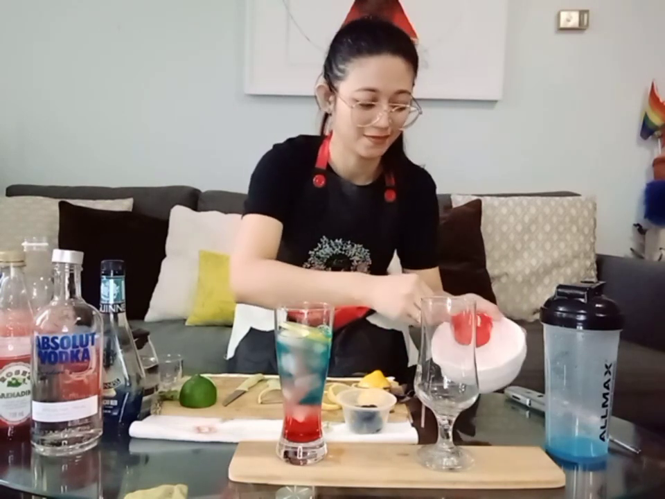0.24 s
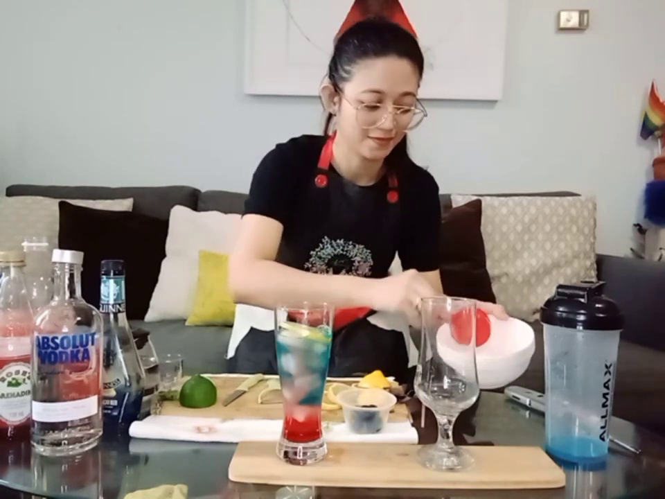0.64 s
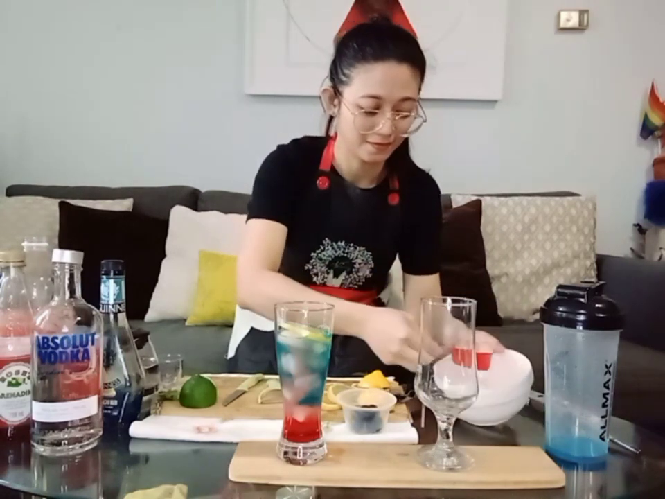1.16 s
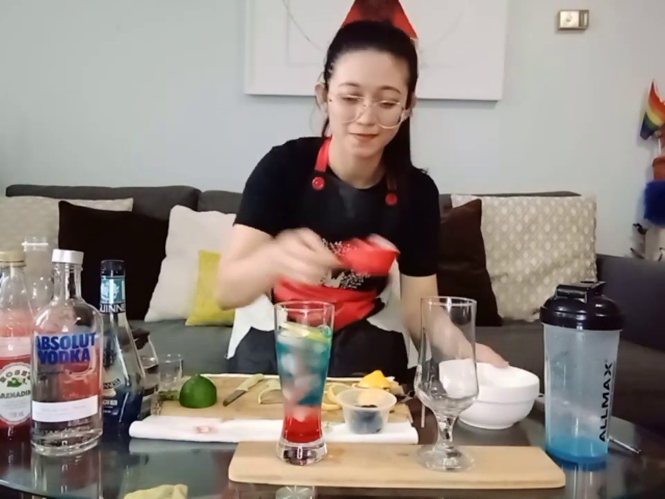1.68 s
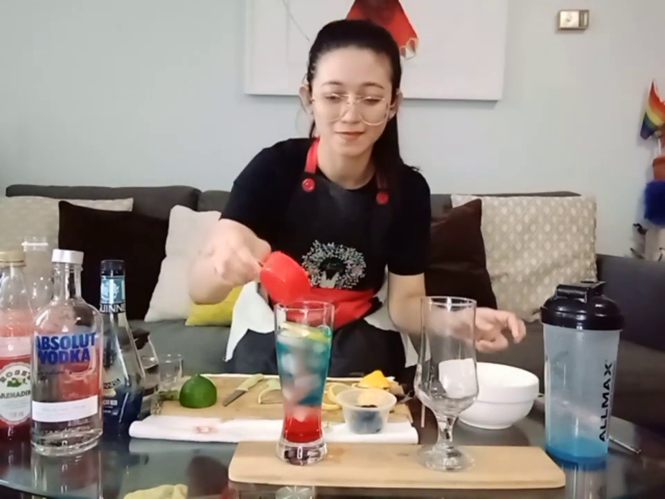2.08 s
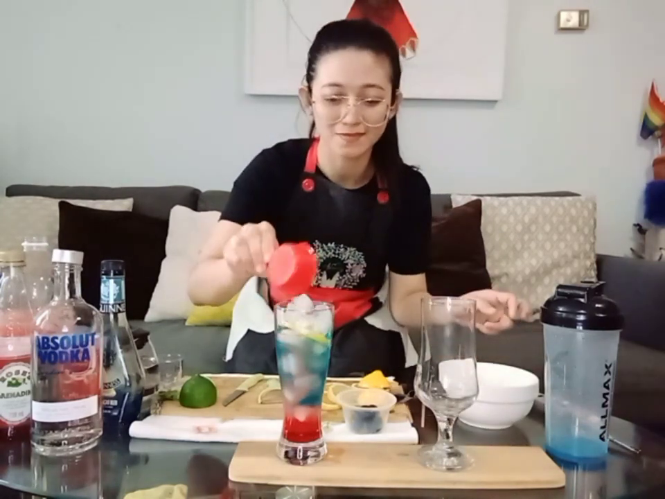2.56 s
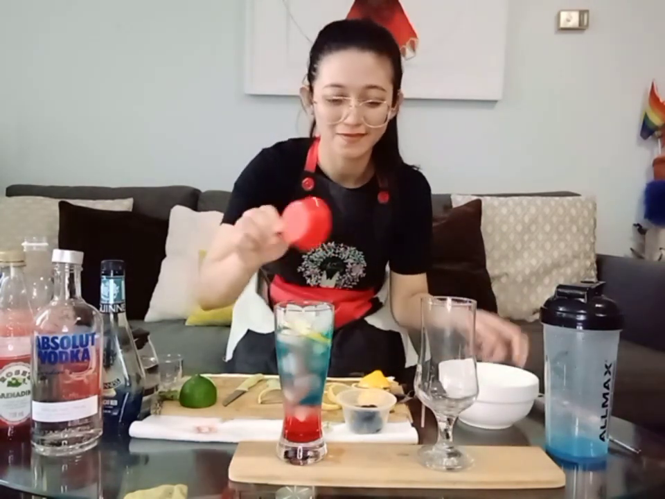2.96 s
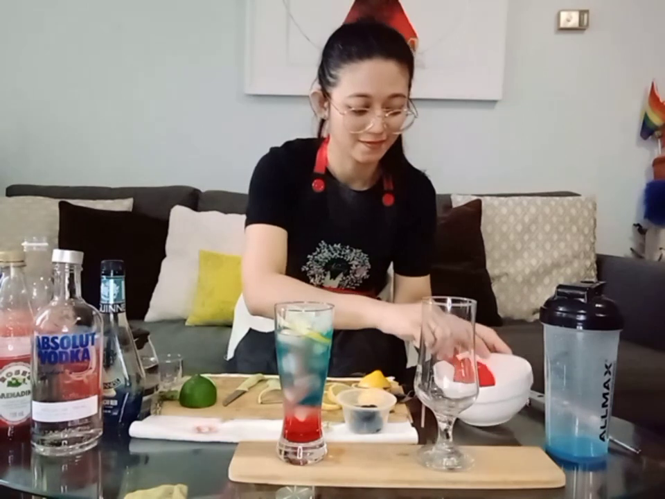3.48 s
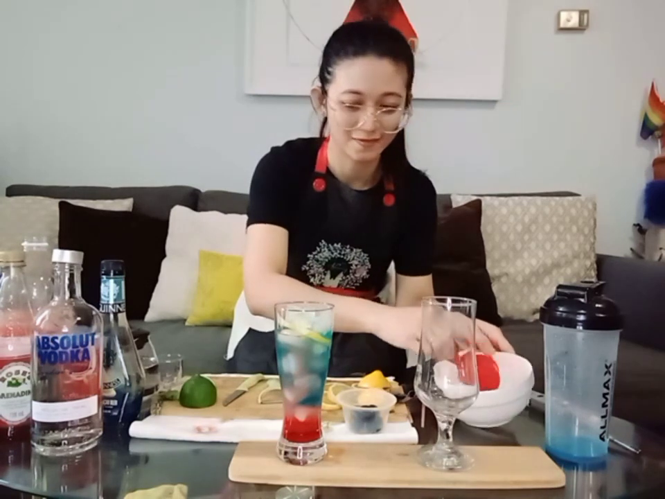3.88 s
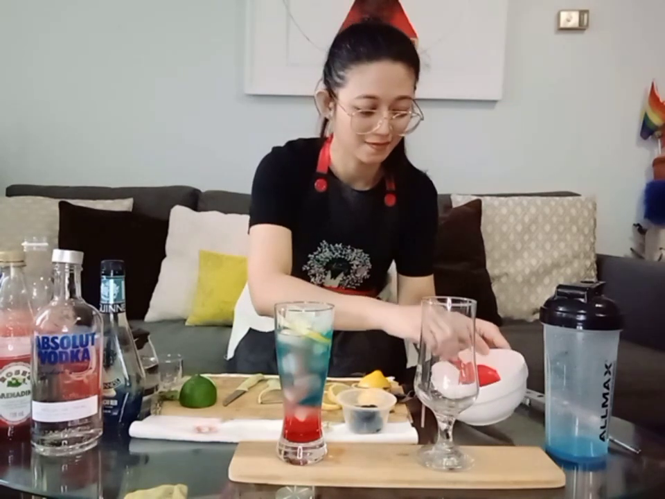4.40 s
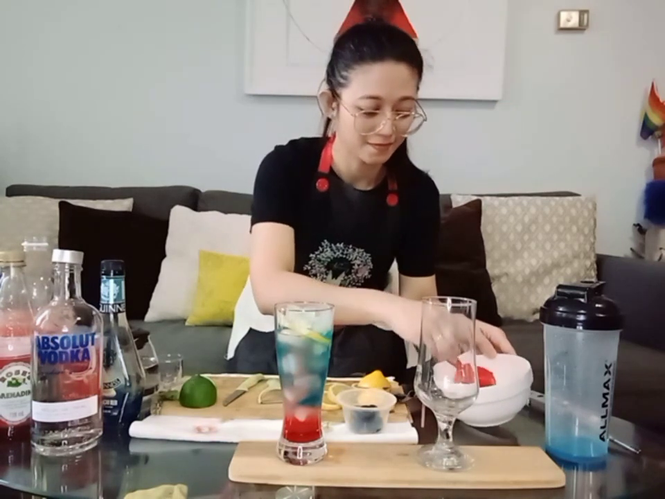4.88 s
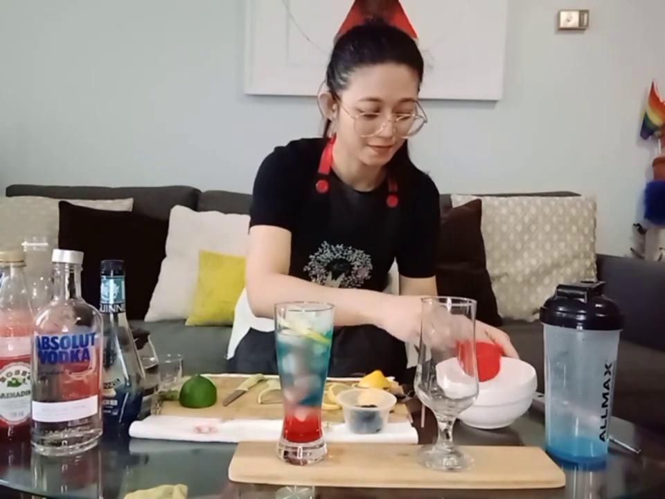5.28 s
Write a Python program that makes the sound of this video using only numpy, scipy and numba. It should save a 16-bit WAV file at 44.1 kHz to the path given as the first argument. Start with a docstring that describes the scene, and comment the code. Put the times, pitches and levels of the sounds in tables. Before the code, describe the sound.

Crushed ice crunches and clicks as a plastic cup scoops it from a china bowl, tips it clinking into a glass, then digs again.

```python
"""Crushed ice is scooped from a china bowl with a small plastic cup and tipped into a tall glass, in a furnished room.
First the cup digs: ice crunches and clicks, and the hollow cup hoots along. Around 1.3 to 1.8 s the bowl bumps on
the table. From 1.9 to 3.1 s the ice goes into the glass, which rings when struck; then the cup digs in the bowl again
until the sounds thin out. Tiny random contacts and noise bursts drive resonances of ice, cup, dishes and table;
knocks add short rough sines. A room rumble and faint hiss stay throughout; one microphone, dull above 8 kHz."""
import sys
import numpy as np
from scipy import signal
from scipy.fft import rfft, irfft, next_fast_len
from scipy.io import wavfile
from numba import njit

SR = 44100
rng = np.random.default_rng(int(sys.argv[2]) if len(sys.argv) > 2 else 0)


def master_out(mix):
    """Clip the mix to full scale and print it as 16-bit PCM to the path in sys.argv[1]."""
    frames = np.transpose(np.atleast_2d(mix))
    ceiling = np.clip(frames, -1, 1)
    pcm = np.round(ceiling * 32767).astype(np.int16)
    wavfile.write(sys.argv[1], SR, pcm)


N = 244314

POUR_START_S, POUR_END_S = 1.9, 3.1   # the cup is over the glass
RUMBLE_DB, HISS_DB = -62, -77
ROOM_T60_S, ROOM_DB, WALL_CUT_HZ = 0.28, -13, 4450   # t60: time to die away by 60 dB
PIECE_T60_S = 0.04
SECOND_RING_DB, SECOND_RING_LOW_HZ, SECOND_RING_HIGH_HZ = -13.5, 2200, 7044
SKID_SWELL_DB_PER_S, SKID_FADE_DB_PER_S = 599, 223
# slopes bend downward: twice as steep once the straight slope would be this far under the level
SWELL_BEND_DB, FADE_BEND_DB = 47, 92.5
MIC_TOP_HZ, CUTOFF_HZ = 8060, 8586


def from_db(db):
    """Decibels to gain."""
    return 10 ** (np.asarray(db) / 20)


def rms_one(x):
    """Scaled to an average strength (rms) of 1."""
    return x / np.sqrt(np.mean(x ** 2) + 1e-20)


def in_time(rows):
    """Each column after the first as a curve over time, one value a sample."""
    s, *columns = np.transpose(rows)
    return [np.interp(np.arange(N) / SR, s, column) for column in columns]


def at_hz(points, hz):
    """Level in dB at any pitch, read between points on a log-frequency axis."""
    points_hz, points_db = np.transpose(points)
    return np.interp(np.log(hz), np.log(points_hz), points_db)


def band(x, low_hz, high_hz):
    """Keeps what lies between two frequencies."""
    return signal.sosfilt(signal.butter(2, [low_hz, high_hz], "band", fs=SR, output="sos"), x)


def high(x, low_hz):
    """Keeps what lies above a frequency."""
    return signal.sosfilt(signal.butter(3, low_hz, "high", fs=SR, output="sos"), x)


def low(x, top_hz, order):
    """Keeps what lies below a frequency."""
    return signal.sosfilt(signal.butter(order, top_hz, fs=SR, output="sos"), x)


def ring(clicks, hz, t60):
    """A unit click sets a sine of height 1 ringing; it falls by 60 dB in t60 seconds."""
    decay, turn = from_db(-60 / (t60 * SR)), 2 * np.pi * hz / SR
    # the tiny offset keeps the filter away from very slow, near-zero numbers
    return signal.lfilter([0, np.sin(turn)], [1, -2 * decay * np.cos(turn), decay * decay], clicks + 1e-18)


def flicker(per_s, spread_db):
    """A gain that wanders at random, per_s steps a second."""
    steps = from_db(spread_db * rng.standard_normal(2000))
    return np.interp(np.arange(N) * (per_s / SR), np.arange(2000), steps)


def grains(per_s, spread_db):
    """Random tiny contacts; each one's rarity, times spread_db, sets its level."""
    born = rng.random(N) < per_s / SR
    luck = rng.random((2, N))
    rarity = np.minimum(-np.log(luck[0, born] + 1e-9), 5)   # mostly small, seldom large
    out = np.zeros(N)
    out[born] = from_db(spread_db * rarity) * np.sign(luck[1, born] - .5)
    return out


def swells(full_s, level_db, swell, hold_s, fade):
    """Events swell up to a level at full_s, hold it and fade, slopes in dB per s; powers add up, given in dB."""
    t = np.arange(0, N + 44, 44) / SR   # about one point a millisecond
    late = t - np.array(full_s)[:, None]
    before_db = np.abs(swell) * np.maximum(-late, 0)
    after_db = np.abs(fade) * np.maximum(late - np.maximum(hold_s, 0), 0)
    rise_db = before_db * (1 + before_db / SWELL_BEND_DB / 2)
    fall_db = after_db * (1 + after_db / FADE_BEND_DB / 2)
    power = np.sum(from_db(2 * (level_db - rise_db - fall_db)), axis=0)
    return np.interp(np.arange(N) / SR, t, 10 * np.log10(power + 1e-14))


def steady(spectrum, level_db):
    """Steady noise: every frequency of white noise is weighted by the given colour."""
    size = next_fast_len(N)
    hz = np.maximum(np.arange(size // 2 + 1) * SR / size, 1)
    coloured = rfft(rng.standard_normal(size)) * from_db(at_hz(spectrum, hz))
    return from_db(level_db) * rms_one(irfft(coloured, size)[:N])


def rumble():
    """The low rumble of the room, as steady noise with its strongest peaks near 40 and 360 Hz."""
    # colour of the rumble: pitch_hz, level_db (relative, per Hz)
    rumble_colour = [(15, -33), (25, -12.5), (40, -1), (55, -15.5), (80, -12.5), (110, -9), (160, -15.5),
                     (240, -3), (280, -8), (320, -9), (362, 2), (410, -17), (480, -24), (700, -34.5),
                     (1500, -100)]
    return steady(rumble_colour, RUMBLE_DB)


def hiss():
    """A faint steady hiss, as noise that fades out toward the top."""
    # colour of the hiss: pitch_hz, level_db (relative, per Hz)
    hiss_colour = [(410, -40), (700, -10), (722, -5), (1120, -10), (1190, -3), (1260, -13), (6300, -21),
                   (8430, -33), (11000, -63), (18500, -120)]
    return steady(hiss_colour, HISS_DB)


def room(x):
    """Echoes go round twelve feedback delays, duller on every round, worked out per frequency."""
    size = next_fast_len(N + SR)
    circle = np.exp(-2j * np.pi * np.arange(size) / size)
    bins = np.arange(size // 2 + 1)
    dull, echoes = np.exp(-2 * np.pi * WALL_CUT_HZ / SR), 0
    for k, lag in enumerate((rng.uniform(0.0054, 0.021, 12) * SR).astype(int)):
        late = circle[lag * bins % size]   # a delay of lag samples
        wall = (1 - dull) / (1 - dull * circle[bins])
        loop = from_db(-60 * lag / SR / ROOM_T60_S) * wall * late
        echoes = echoes + (-1) ** k * loop / (1 - loop)
    return irfft(rfft(x, size) * echoes, size)[:N]


def bumps():
    """The foot of the bowl lands unevenly: a short rattle shakes the table, with a deep share for each bump."""
    # bowl bumping on the table: start_s, level_db (before the filters), deep_db (re level),
    # rattle_s (time for the rattle's longer part to fall 60 dB)
    bump_rows = [(1.258, -18, -29, 0.1), (1.273, -13, -19.5, 0.062), (1.284, -30, -21.5, 0.06),
                 (1.351, -9, -16.5, 0.033), (1.399, -44.5, -17, 0.036), (1.478, -33, -4, 0.043),
                 (1.529, -46, -22, 0.06), (1.78, -15, -39, 0.022), (1.789, -23, -26, 0.1),
                 (1.804, -22, -16, 0.023), (3.383, -53.5, -21.5, 0.065), (3.393, -40.5, -17, 0.029),
                 (4.511, -41.5, -1.5, 0.023)]
    # tones of table top and bowl foot, the four deepest first: pitch_hz, level_db (relative), t60_s
    table_tones = [(80, -1, .25), (155, -8, .15), (205, -2, .14), (260, -1, .12), (480, -3, .09),
                   (590, -2, .09), (710, 0, .08), (820, 0, .07), (905, 1, .08), (1150, 0, .06)]
    s, level_db, deep_db, rattle_s = np.transpose(bump_rows)
    t = np.arange(int(.2 * SR)) / SR
    fade_db = -60 * t / np.clip(rattle_s, .02, .2)[:, None]
    onset = np.minimum(t / 0.0021, 1) * (1 + 1.2 * from_db(-60 * t / 0.019))   # extra strong at first
    rattle = rng.standard_normal((len(s), len(t))) * from_db(fade_db) * onset
    deep_push, upper_push = np.zeros((2, N + len(t)))
    for k, i in enumerate(np.round(s * SR).astype(int)):
        deep_push[i:i + len(t)] += from_db(level_db[k] + deep_db[k] - 22) * rattle[k]
        upper_push[i:i + len(t)] += from_db(level_db[k] - 37) * rattle[k]
    deep = sum(from_db(db) * ring(deep_push[:N], hz, t60) for hz, db, t60 in table_tones[:4])
    upper = sum(from_db(db) * ring(upper_push[:N], hz, t60) for hz, db, t60 in table_tones[4:])
    dull = low(band(upper_push[:N], 310, 2000), 2000, order=2)
    return band(deep, 92, 230) + band(upper, 300, 1000) + from_db(37.5) * dull


def vessel(clicks):
    """Whatever the ice touches rings at its own tones: the glass while pouring, else the bowl."""
    # tones of the china bowl, then of the glass: pitch_hz, level_db (on average), t60_s
    bowl_tones = [(1990, -6, .13), (3230, -7, .1), (3505, -2, .12), (3560, -8, .1), (4270, -12, .06),
                  (5320, -8, .09), (5440, -11, .08), (6480, -11, .05)]
    glass_tones = [(1650, -3, .1), (2864, -12, .06), (3117, -3, .06), (3984, -5, .07), (4840, -9, .05),
                   (6080, -6, .05), (6660, -9, .05)]
    t = np.arange(N) / SR
    pouring = (t > POUR_START_S) & (t < POUR_END_S)
    glass = sum(ring(clicks * pouring * from_db(db) * flicker(85, 1.4), hz, t60)
                for hz, db, t60 in glass_tones)
    bowl = sum(ring(clicks * ~pouring * from_db(db) * flicker(71, 0.85), hz, t60)
               for hz, db, t60 in bowl_tones)
    return high(glass + bowl, 1600)


@njit
def hollow(x, cos_w, r):
    """A resonance whose centre and width move from sample to sample; its power stays about the same."""
    y = np.zeros(len(x))
    for i in range(2, len(x)):
        push = np.sqrt(1 - r[i]) * (x[i] - x[i - 2])
        y[i] = push + 2 * r[i] * cos_w[i] * y[i - 1] - r[i] * r[i] * y[i - 2]
    return y


def cup(x, cup_hz, width_hz):
    """A moving resonance in Hz, such as the air in the cup, which follows how full and tilted it is."""
    return hollow(x, np.cos(2 * np.pi * cup_hz / SR), np.exp(-np.pi * np.clip(width_hz, 40, 3000) / SR))


def cup_twice(x, cup_hz, width_hz):
    """Two such resonances in a row: steep skirts keep the hoot clear of its neighbours."""
    return cup(cup(x, cup_hz, 2 * width_hz), cup_hz, width_hz)


def cup_air():
    """The air's resonance: fairly tight at first, broad from bumps into pour, tight late in pour and last digging."""
    # air in the cup, its pitch follows how full it is: time_s, pitch_hz, width_hz (nominal)
    cup_rows = [(0, 1406, 260), (.12, 1333, 300), (.23, 1760, 320), (.42, 1900, 320), (.66, 2056, 325),
                (.75, 1764, 325), (.93, 1940, 330), (.97, 1706, 330), (1.2, 1880, 330), (1.26, 1640, 1200),
                (1.9, 1577, 1200), (1.94, 2200, 1200), (2.34, 2043, 1200), (2.41, 1590, 130),
                (2.7, 1681, 130), (2.78, 2132, 500), (2.9, 1544, 500), (3.45, 1445, 500), (3.53, 1520, 150),
                (3.7, 1460, 150), (4.1, 1545, 150), (4.4, 1590, 150), (4.52, 1550, 150), (5.0, 1480, 150),
                (5.3, 1670, 150), (5.54, 1595, 150)]
    return in_time(cup_rows)


def skids():
    """A piece skids along the bowl wall: fine friction through one narrow resonance at its pitch."""
    # skidding pieces: full_s (time at which the swell reaches full level), hold_s,
    # level_db (before a common trim), pitch_hz
    skid_rows = [(0.458, 0.07, -49.5, 3540), (4.072, 0.034, -48, 3455), (4.232, .005, -65, 3170),
                 (5.123, 0.016, -42, 3250), (5.281, 0.0069, -47, 3400), (5.368, 0.0025, -50.5, 3250)]
    full_s, hold_s, level_db, hz = np.transpose(skid_rows)[:, :, None]
    course_db = swells(full_s[:, 0], level_db, SKID_SWELL_DB_PER_S, hold_s, SKID_FADE_DB_PER_S)
    latest = np.searchsorted(full_s[1:, 0] - .02, np.arange(N) / SR)   # the pitch is ready 20 ms ahead
    rub = cup_twice(grains(3400, spread_db=-0.5), hz[latest, 0], np.full(N, 90.))
    return from_db(course_db - 5.5) * rms_one(rub)


def knocks(cup_hz, width_hz):
    """A crack, two short rough rings of the piece and a hoot of the cup; also the blows on bowl or glass."""
    # single knocks of ice: start_s, level_db (before the filters), piece_hz (ring of the piece),
    # then re level: piece_db, cup_db (push on the cup's air, before a trim), dish_db (blow on bowl or glass)
    knock_rows = [(0.0414, -40.5, 3630, -20, 19, -16), (.0514, -42.5, 3600, -15.5, 18.5, -21),
                  (0.0825, -36.5, 2880, -3, 15, -8), (0.1191, -8, 4630, -15.5, -7, -27),
                  (.1381, -7, 3020, -10.5, 0, -38), (0.1501, -11.5, 3170, -14, 3, -9),
                  (.1564, -14, 2120, -6, -13, -45), (0.2064, -10.5, 5630, -20, -10, -29),
                  (0.2308, -16.5, 2140, -4.5, 6, -19), (.3217, -29, 3470, -3, -4, -21),
                  (.3314, -37, 2310, -3, -17, -18), (.4324, -33, 6640, -9, -19, -18),
                  (0.4428, -36, 5260, 6.5, -4, -30), (.4643, -24.5, 5370, 1, -20, -17),
                  (.6499, -37.5, 4300, -10, -7, -14), (0.669, -20.5, 2090, -11, -24, -40),
                  (.7073, -34, 5340, 7.5, -16, -17), (0.7209, -19.5, 5400, -7.5, -8, -20),
                  (0.939, -23.5, 5360, -7, 1, -29), (.9624, -9, 6850, -7, -21, -33),
                  (1.0311, -5, 6440, -13, -28, -29), (1.046, -13, 5110, -7.5, -5, -31),
                  (1.0998, -14, 3100, -10.5, 3.5, -24), (1.274, -13, 2150, -5, 15, -34),
                  (1.3543, -15.5, 2410, -4.5, 8, -16.5), (1.5229, -24, 4210, -8, -2, -31.5),
                  (1.7861, -25.5, 2660, 0, 1, -21), (1.9357, -24.5, 3540, -9, -25, -14.5),
                  (1.9544, -18.5, 2370, -9, -17, -25), (2.0316, -24.5, 6640, -8, -5, -40),
                  (2.2921, -40.5, 4200, -1, -19.5, -15), (2.3097, -13.5, 2330, -12.5, 1.5, -33),
                  (2.3501, -18.5, 2160, -10.5, -16, -28), (2.4051, -12, 6070, -23, -6, -22),
                  (2.435, -9, 3670, -14, -12, -6.5), (2.4398, -3.5, 3020, -34, -7.5, -26),
                  (2.5185, -11.5, 4100, -10.5, -33, -34), (2.5661, -24, 2900, -7, -23, -28),
                  (2.614, -16.5, 4690, -6, -27, -29), (2.7165, -25.5, 4380, -8, -30, -34),
                  (2.7695, -28, 2900, -14, -20, -41), (2.7854, -29, 3290, -14, -17, -42),
                  (2.9237, -35.5, 5050, 1, 9.5, -23), (2.9342, -32.5, 6870, -1.5, -11.5, -25.5),
                  (3.5095, -11, 4850, -12, -13, -36.5), (3.5418, -12.5, 6600, -5, -1.5, -30),
                  (3.5517, -7.5, 6500, -6, -1, -33), (3.595, -15.5, 3490, -7.5, -12, -24),
                  (3.6411, -29, 6550, 1, -19, -23), (3.6636, -33, 6650, 3, 6, -36),
                  (3.7142, -17.5, 5800, -11.5, 0.5, -25), (3.763, -37.5, 6800, -9, 14.5, -37),
                  (3.9165, -40.5, 2400, -2.5, -15, -27.5), (3.9632, -35.5, 2340, -6, 11, -24),
                  (4.0004, -28.5, 6400, -2, -18, -10.5), (4.0202, -36, 6260, -11, 16, -25),
                  (4.0422, -30.5, 3650, -10, -25, -35), (4.0894, -40.5, 3650, 1, -19, -24),
                  (4.2016, -39.5, 4730, -12, -35, -19), (4.2316, -42, 3120, 3.5, -26.5, -16),
                  (4.375, -13.5, 4950, -16.5, -1, -30), (4.3901, -12, 4820, -13.5, -6.5, -25),
                  (4.4987, -40, 6800, -3, -15, -16), (4.5126, -21, 2480, -14, 13, -36),
                  (4.5796, -29, 2460, -3, -12.5, -24), (4.6942, -13.5, 4520, -14.5, -2.5, -25),
                  (4.7064, -28.5, 6730, -1, -6, -29), (4.7609, -16.5, 3680, -11, 8, -30.5),
                  (4.8342, -22.5, 6470, -18, 6, -21), (4.93, -24.5, 5550, -15, 3, -33),
                  (4.954, -29.5, 6700, -14, 19, -29), (4.9706, -25, 3680, -10, 15, -26),
                  (4.9852, -37, 5170, -13, 14, -28), (5.001, -27, 6200, -9, 7, -39),
                  (5.0578, -23, 4265, -9.5, 11, -34), (5.1198, -34.5, 2470, -1, 10.5, -19),
                  (5.1492, -38, 3150, 2, 13, -35), (5.2217, -39.5, 2860, -3, 10, -20),
                  (5.3715, -47, 3110, 5, -13, -30), (5.4247, -37.5, 4360, -8, -3.5, -34)]
    s, level_db, piece_hz, piece_db, cup_db, dish_db = np.transpose(knock_rows)[:, :, None]
    t = np.arange(int(.15 * SR)) / SR
    noise = rng.standard_normal((len(s), 3, len(t)))
    second_hz = rng.uniform(SECOND_RING_LOW_HZ, SECOND_RING_HIGH_HZ, (len(s), 1))
    cracks = noise[:, 0] * (from_db(-8 - 60 * t / 0.024) + from_db(-8 - 60 * t / 0.0048))
    wobble = np.cumsum(noise[:, 1:], axis=2) * .05   # a tumbling piece keeps no steady phase
    first = from_db(piece_db) * np.sin(2 * np.pi * piece_hz * t + wobble[:, 0])
    second = from_db(SECOND_RING_DB) * np.sin(2 * np.pi * second_hz * t + wobble[:, 1])
    sounds = from_db(level_db) * (cracks + (first + second) * from_db(-60 * t / PIECE_T60_S))
    at = np.round(s[:, 0] * SR).astype(int)
    out, push, blows = np.zeros(N + len(t)), np.zeros(N), np.zeros(N)
    for i, sound in zip(at, sounds * np.minimum(t / 0.0006, 1)):
        out[i:i + len(t)] += sound
    push[at] = from_db(level_db + cup_db - 2.5)[:, 0]
    blows[at] = from_db(level_db + dish_db)[:, 0]
    hoots = high(cup_twice(push, cup_hz, width_hz), 720)
    return band(out[:N], 1000, 9500) + hoots, blows


def surges():
    """The heap gives way in surges: level of the crunch, then of each part that it drives re crunch."""
    # surges that swell, hold and die: full_s (time at which the swell reaches full level),
    # crunch_db (before trims), swell_db_per_s, hold_s, fade_db_per_s (before its share),
    # then re crunch: top_db, cup_db, heap_db, table_db, taps_db (on bowl or glass)
    surge_rows = [(.105, -50.5, 50, 0.026, 300, -5, 8.5, -6.5, -22, -2.5),
                  (0.119, -23.5, 3000, 0.094, 228, -2.5, -1, -20, -45.5, -11),
                  (0.321, -40.5, 600, 0.033, 252, -3.5, 2, -25, -27.5, -5),
                  (.434, -46, 1500, 0.02, 200, -2, -2, -20, -35, -12),
                  (.458, -41.5, 700, 0.031, 166, -3, -2.5, -15, -46, 2.5),
                  (.668, -42.5, 2000, 0, 250, 0.5, 2, -8, -24, -11),
                  (.712, -39, 900, 0.029, 199, -6, 3, -11, -29, -13),
                  (0.75, -28, 330, 0, 151, -4, -2.5, -14, -30.5, -11),
                  (.805, -42.5, 500, 0.033, 170, -5, -4, -25.5, -27, -10),
                  (0.943, -36, 1800, 0.1, 199, -6, 11, -20, -25.5, -5),
                  (0.964, -15.5, 1040, 0.0052, 203, -2, -7, -14.5, -28.5, -16),
                  (1.032, -22, 900, 0.041, 140, -2.5, -3, -12, -16, -9),
                  (1.119, -32, 297, 0.013, 192, -2, 8, -29, -25, 4.5),
                  (1.276, -18, 740, 0, 190, -3, 6.5, 0.5, -9, -7.5),
                  (1.355, -22, 1600, 0, 181, -2.5, 11, 3.5, -2.5, -14),
                  (1.4, -41.5, 400, 0.052, 110, -1.5, -3, -6, -2, -12),
                  (1.48, -44.5, 400, 0.00077, 195, 4.5, 18.5, 6, -2.5, -10),
                  (1.526, -40, 680, 0.0088, 157.4, -15, 14, 4, 0, -8),
                  (1.784, -34, 1470, 0, 292, -23, 21.5, 13.5, -4.5, -1),
                  (1.938, -27.5, 1260, 0.023, 240, -2.5, -1, -23, -36, -14),
                  (2.03, -38, 497, 0.0079, 270, -3, -9, -37.5, -28.5, -16),
                  (2.292, -38.5, 2500, 0.013, 200, -11.5, 9.5, -30, -18.5, -7),
                  (2.309, -30, 1490, 0, 150, -4, 7, -19.5, -22.5, -8.5),
                  (2.35, -34, 600, 0.072, 151, -6, -0.5, -15.5, -24, -15),
                  (2.434, -24, 450, 0.088, 133, -1.5, -18, -23, -26, -9),
                  (2.615, -37, 500, 0, 130, -1, -17, -27, -16, -9),
                  (2.721, -42.5, 600, .065, 375, -10.5, -11, -19, -35, -8),
                  (2.923, -40, 2000, 0.02, 330, 0.5, -10, -20.5, -17.5, -14.5),
                  (3.386, -64.5, 1200, 0.0057, 300, -17, 5.5, 10, 14.5, -2.5),
                  (3.46, -75, 600, 0, 300, -20, 13.5, 4.5, 9.5, -8),
                  (3.494, -48.5, 2520, 0.029, 199, -5.5, -15.5, -26, -21, -8.5),
                  (3.511, -28.5, 1500, 0.0049, 170, -5.5, -12, -25, -15, -19),
                  (3.545, -24.5, 1090, 0.065, 131.4, -1, -0.5, -9, -21.5, -19),
                  (3.712, -41, 800, 0.027, 73, -1.5, -10.5, -13, -22.5, -9.5),
                  (3.96, -53, 298, 0.0071, 200, -2, 13, 6, -6.5, -13),
                  (4, -34, 497, 0.0055, 260, -1.5, 2, -0.5, -7.5, -15),
                  (4.042, -42.5, 800, 0, 262, -9, 3.5, 3.5, 0, -11),
                  (4.091, -56.5, 400, 0.036, 290, -7, -12, 1.5, 4, -1),
                  (4.203, -53.5, 1800, 0.0011, 250, -9, -28, -22, -11, -8.5),
                  (4.231, -51.5, 900, 0, 249, -14, -32, -15, -9.5, -4.5),
                  (4.375, -28.5, 2200, 0.01, 122, -2, 1.5, -4, -20.5, -17.5),
                  (4.498, -40, 900, 0, 398, 0.5, 6, 3, -2, -14),
                  (4.515, -31, 1490, 0.031, 155, -2.5, 1.5, -2.5, -16, -4),
                  (4.695, -28, 1430, 0, 258, 0.5, 5.5, -5.5, -13, -17),
                  (4.761, -34, 1200, 0.014, 130, -2, 4.5, 1, -15.5, -11.5),
                  (4.885, -39.5, 300, 0.051, 200, -0.5, 6.5, -4.5, -15, -13),
                  (4.927, -32.5, 400, 0.0038, 400, -7, 1.5, -1.5, -17, -18),
                  (4.97, -36, 497, 0.05, 200, -2.5, 3.5, -2.5, -18, -11),
                  (5.056, -37, 900, 0.011, 600, -6, -2, -2, -7, -4),
                  (5.119, -45.5, 2010, 0.059, 129, -2.5, 5.5, -1, -22, -12),
                  (5.223, -50, 300, 0.027, 270, -7, -4, 3.5, -0.5, 3.5),
                  (5.374, -51.5, 2500, 0.0097, 750, -30, -16, -10, -6, -7),
                  (5.428, -54, 2020, 0.03, 360, -3.5, 0.5, -9, -14, -12)]
    # the top dies faster than the crunch, the low parts linger: share of the surge's fade (no unit)
    # for crunch, top, cup, heap, table, taps
    fade_shares = [0.96, 1.04, .75, 0.73, 0.78, .9]
    full_s, crunch_db, swell, hold_s, fade, *parts_db = np.transpose(surge_rows)[:, :, None]
    crunch, *parts = [swells(full_s[:, 0], crunch_db + part_db, swell, hold_s, share * fade)
                      for part_db, share in zip([0, *parts_db], fade_shares)]
    return crunch, *[part - crunch for part in parts]


def sliding_ice(crunch_db, top_db, cup_db, heap_db, table_db, cup_hz, width_hz):
    """Dense contacts ring small pieces of ice of every size, the hollow cup, the heap and the table under it."""
    # colour of the crunch: pitch_hz, level_db (relative)
    ice_colour = [(2300, -7), (3100, -3), (4200, -0.5), (5200, -0.5), (6600, 5), (7600, 3)]
    contacts, dealt = grains(6500, spread_db=-1.0), rng.integers(0, 30, N)
    # each size of piece gets its own contacts, and comes and goes on its own
    pieces = [from_db(at_hz(ice_colour, hz)) * flicker(14, 2.5) * ring(contacts * (dealt == k), hz, 85.0 / hz)
              for k, hz in enumerate(np.geomspace(2200, 7900, 30))]
    large = rms_one(high(sum(pieces[:20]), 1800))
    small = rms_one(high(sum(pieces[20:]), 4300))
    large_share = np.sqrt(np.clip(1 - from_db(2 * top_db), .05, 1))   # the power that the small pieces leave
    hoot = rms_one(cup_twice(band(grains(1500, spread_db=0.5), 800, 2300), cup_hz, 1.27 * width_hz))
    heap = rms_one(high(band(grains(1200, spread_db=-2.0), 718, 1310), 620))
    shake = rms_one(band(grains(1200, spread_db=1.5), 170, 480))
    crunch = from_db(-4) * (large_share * large + from_db(top_db) * small)
    below = from_db(cup_db - 4) * hoot + from_db(heap_db - 5) * heap + from_db(table_db - 6) * shake
    return from_db(crunch_db) * flicker(90, 1.4) * (crunch + below)   # contacts come in clumps


def scene():
    """All sources at one microphone; knocks, bumps and ringing dishes wake the room."""
    crunch_db, top_db, cup_db, heap_db, table_db, taps_db = surges()
    cup_hz, width_hz = cup_air()
    clicks, blows = knocks(cup_hz, width_hz)
    taps = from_db(crunch_db + taps_db - 22) * grains(910, spread_db=4.5)
    hits = clicks + bumps() + vessel(blows + taps)
    ice = sliding_ice(crunch_db, top_db, cup_db, heap_db, table_db, cup_hz, width_hz)
    background = rumble() + hiss()
    mono = background + from_db(ROOM_DB) * room(hits) + hits + skids() + ice
    return np.array([mono, mono])


def record(dry):
    """Peaks are rounded, the microphone rolls off near the top, then the top is cut."""
    rounded = 0.4 * np.tanh(dry / 0.51)
    soft = low(rounded, MIC_TOP_HZ, order=6)
    return signal.sosfilt(signal.cheby2(8, 38, CUTOFF_HZ, fs=SR, output="sos"), soft)


dry = scene()
out = record(dry)
master_out(out)
```